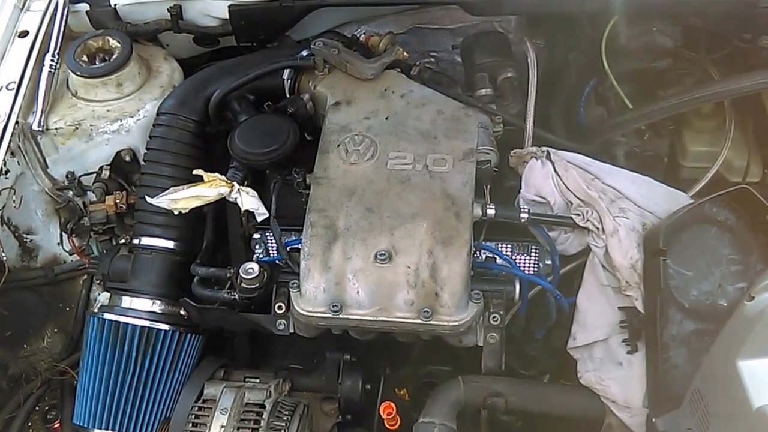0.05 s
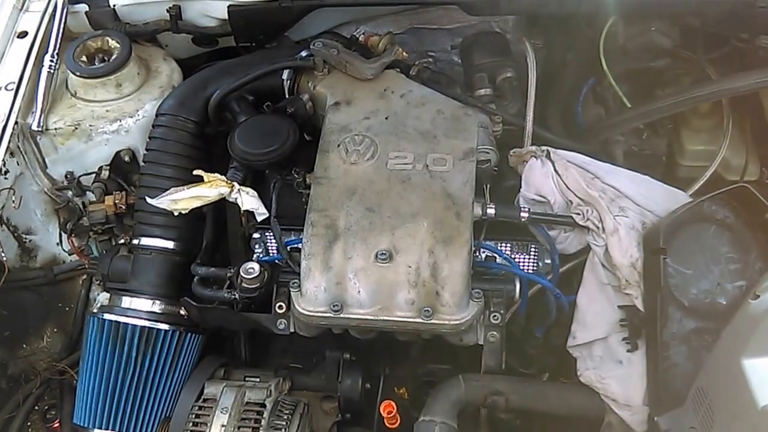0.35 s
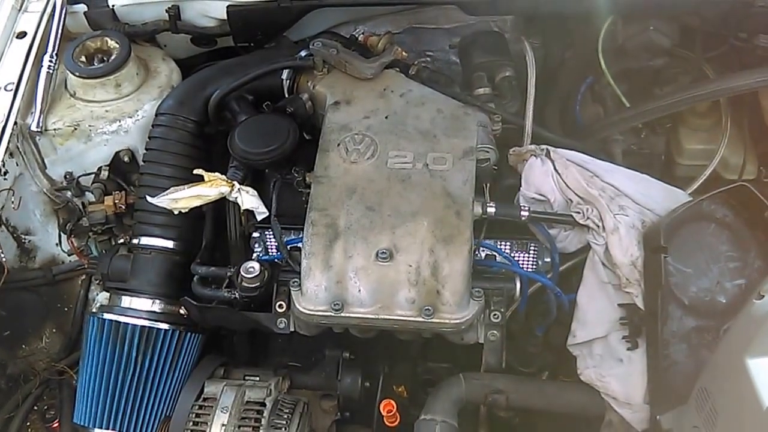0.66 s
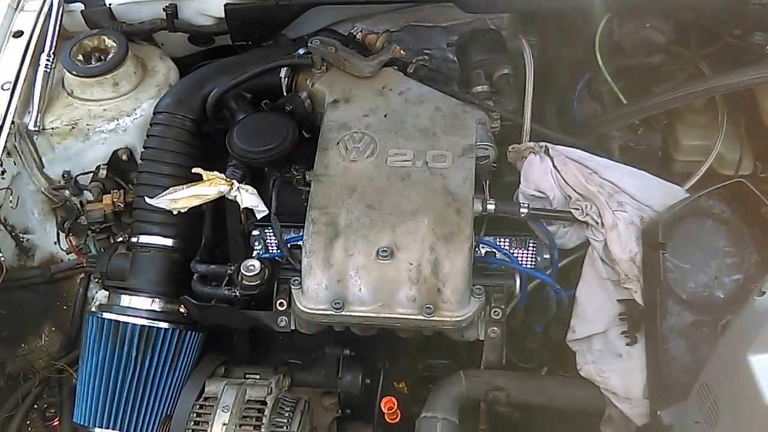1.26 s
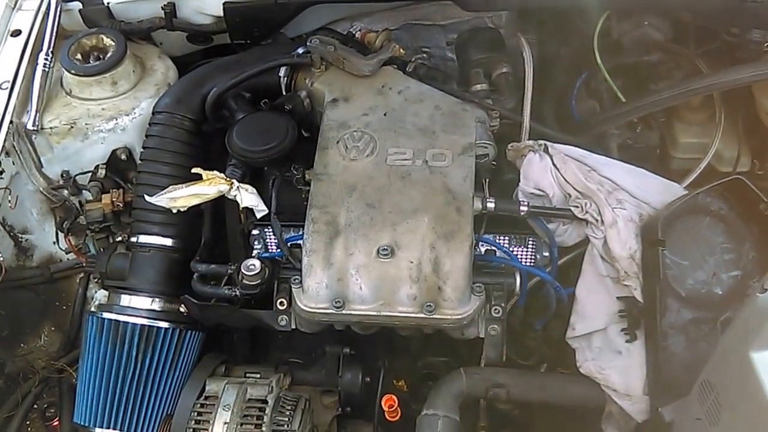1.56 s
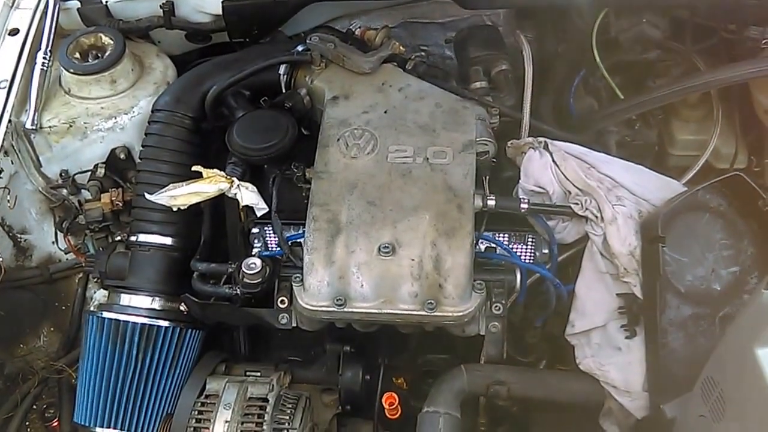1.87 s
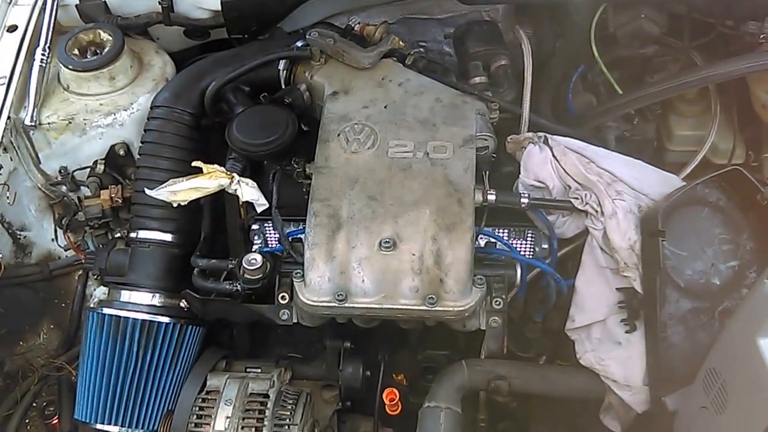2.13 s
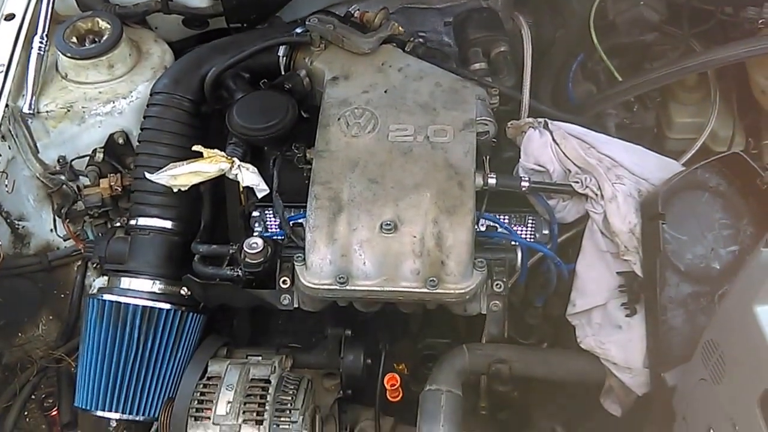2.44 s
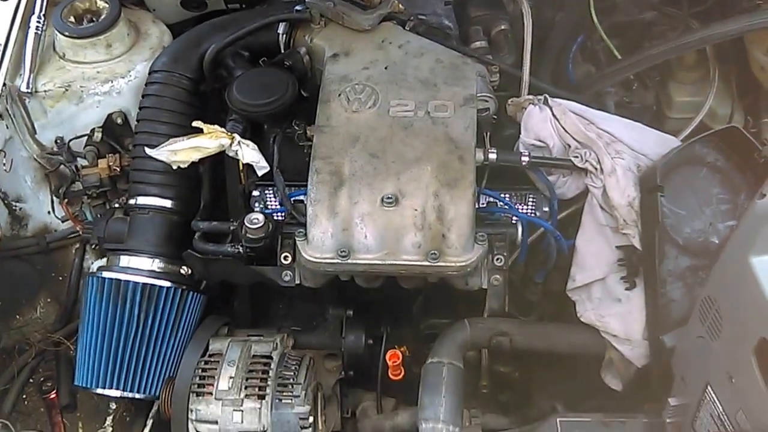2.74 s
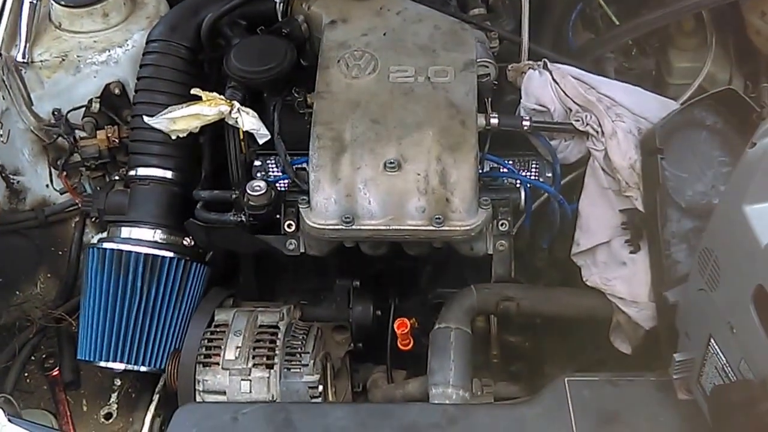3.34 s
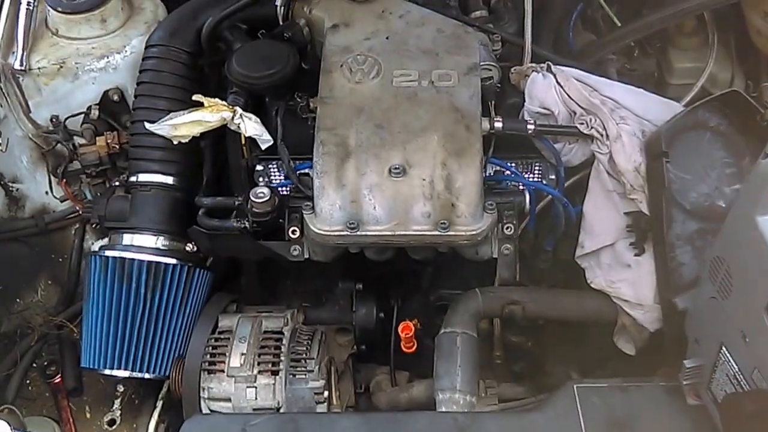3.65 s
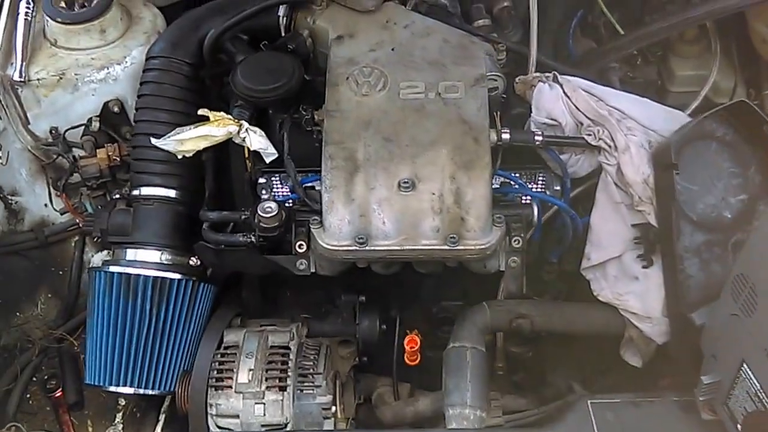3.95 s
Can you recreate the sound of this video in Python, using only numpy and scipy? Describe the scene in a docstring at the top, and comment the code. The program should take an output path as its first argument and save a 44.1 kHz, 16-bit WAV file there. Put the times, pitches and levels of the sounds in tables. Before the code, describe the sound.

A car engine idles throughout the four seconds, heard close over the open engine bay. Its lumpy chug repeats about seven or eight times a second, each a low thump, two sharp airy chuffs and a soft gulp. Faint whistles and a slightly metallic intake hiss lean left, over a steady rumble and whirr. At about 3.2 seconds the engine stumbles briefly, then resumes its rhythm.

```python
"""Lumpy idle at the open engine bay

A four-cylinder petrol engine, two microphones close over the bay and its cone air filter. Each cycle has
four unequal intake strokes: a thump, two sharp chuffs and a soft gulp. Every stroke pushes the air in the
intake, rings it on a rising note and draws a rush of air with faint whistles. The engine stumbles once.
Underneath, the machinery rumbles and whirrs; bonnet and panels throw back short reflections."""
import sys
import numpy as np
from scipy import signal
from scipy.fft import rfft, irfft
from scipy.io import wavfile
from scipy.ndimage import uniform_filter1d

SR = 44100
rng = np.random.default_rng(int(sys.argv[2]) if len(sys.argv) > 2 else 0)


def transcribe(u):
    """Save the signal u as a 16-bit wav file named by the first command-line argument.

    u: samples, shape (n,) or (channels, n), limited to [-1, 1]; the rate is SR.
    q: integer samples, one column per channel.
    """
    v = np.clip(np.atleast_2d(u).T, -1, 1)
    q = np.round(v * 32767).astype(np.int16)
    wavfile.write(sys.argv[1], SR, q)


N = 176400

# engine cycles: thump_s, thump_db, first_chuff_s, first_chuff_db, second_chuff_s, second_chuff_db
ENGINE_CYCLES = [(0.0536, 0.6, 0.081, 0.7, 0.1146, -1.2), (0.1868, 0.6, 0.2132, 1.1, 0.2471, -1.0),
                 (0.3202, -0.7, 0.3466, -0.5, 0.3798, 0.7), (0.4525, 0.3, 0.4788, -0.7, 0.5126, -0.1),
                 (0.5847, 0.1, 0.6115, 1.1, 0.6459, -0.6), (0.7186, -0.7, 0.7456, 0.7, 0.7794, 0.8),
                 (0.8513, 0.5, 0.8774, -1.5, 0.9112, -0.0), (0.9835, -0.5, 1.0102, -1.8, 1.0436, 0.1),
                 (1.1159, -0.1, 1.1427, -2.0, 1.1769, 0.6), (1.2487, -0.0, 1.2756, -1.6, 1.3093, -0.1),
                 (1.3815, 0.3, 1.4085, 0.3, 1.4424, 1.8), (1.5171, 1.4, 1.5448, -0.5, 1.5796, -0.2),
                 (1.6513, 0.4, 1.6784, -0.3, 1.7123, 0.3), (1.7868, 0.4, 1.8146, -0.4, 1.8478, 1.4),
                 (1.9211, 0.1, 1.9482, 0.6, 1.9817, 0.0), (2.0552, -0.5, 2.0829, 0.3, 2.1153, 0.2),
                 (2.1884, -0.9, 2.2156, -0.6, 2.2495, 2.2), (2.3246, 0.4, 2.352, -1.0, 2.386, 0.5),
                 (2.4579, -0.6, 2.4848, -0.4, 2.5171, 1.3), (2.5884, -0.4, 2.6151, 0.6, 2.6495, 0.8),
                 (2.7219, -0.2, 2.7485, -1.2, 2.7827, 1.4), (2.8559, -0.1, 2.883, -1.7, 2.9167, 0.4),
                 (2.9893, 0.1, 3.0165, -0.8, 3.0515, -0.6), (3.1271, -0.4, 3.1643, 2.0, 3.1947, -0.7),
                 (3.2761, -0.8, 3.3045, 0.0, 3.3384, -2.6), (3.4101, -0.2, 3.4376, 0.0, 3.4731, 1.9),
                 (3.5492, -0.2, 3.5772, -1.5, 3.6107, -0.3), (3.6817, 1.1, 3.7081, 0.1, 3.7423, 2.2),
                 (3.815, -1.0, 3.8415, -1.0, 3.875, 0.3), (3.9456, -1.3, 3.972, 1.6, 4.009, 0.0)]
# intake ring by stroke: lag_s, pitch_hz, rise_hz_per_s, level_db, attack_s, hold_s, decay_s, push_db
INTAKE_RINGS = dict( thump=(.0001, 203, 1600, -6.6, .0032, .0002, .0105, -18),
                first=(.0055, 198, 6700, -9.6, .0035, .010, .0058, -11),
                second=(.0047, 196, 6900, -13, .0035, .008, .008, -14),
                gulp=(.005, 200, 3900, -16.6, .003, .010, .015, -23),
                stumble=(.0001, 208, 1900, -4.8, .003, .007, .010, -22))
# rush of air by stroke: lag_s, level_db, attack_s, hold_s, decay_s
AIR_RUSHES = dict( thump=(-.003, -24.6, .005, .004, .013), first=(-.0007, -17.1, .002, .0045, .005),
              second=(-.001, -16.4, .003, .004, .0052), gulp=(-.002, -31.7, .006, .007, .018))
# colours of the air in the two chuffs and in the softer draw of thump and gulp: frequency_hz, level_db
FIRST_CHUFF_COLOUR = [(700, -10.9), (950, -2.7), (1200, -3.5), (1480, -2.8), (1650, -3.9), (1880, 0.0),
                      (2100, -4.0), (2400, -3.3), (3300, -6.6), (4300, -7.9), (5200, -8.9), (8000, -7.0),
                      (11500, -8.5), (15500, -14.1)]
SECOND_CHUFF_COLOUR = [(750, -8.4), (1050, 0.0), (1350, -4.8), (1600, -9.5), (2050, -4.2), (2600, -6.7),
                       (3300, -8.9), (4300, -9.2), (5200, -12.8), (8000, -10.8), (11500, -13.1),
                       (15500, -19.6)]
DRAW_COLOUR = [(600, -12.0), (820, -9.6), (950, 0.0), (1200, -12.7), (1600, -12.1), (2200, -10.5),
               (2620, -8.6), (3200, -12.9), (4200, -14.9), (5000, -16.0), (6000, -14.3), (8000, -11.4),
               (11000, -13.8), (15500, -22.1)]
# balance of the air noise between the microphones: frequency_hz, left_minus_right_db
MIC_BALANCE = [(500, 4.5), (750, -0.1), (1000, -6.1), (1300, 5.6), (1800, 11.1), (3000, 8.2), (4500, 13.2),
               (6500, 11.2), (8500, 8.1), (11000, 2.6), (15500, 5.0)]
# pops and whistles by stroke: stroke, lag_s, pitch_hz, rise_hz_per_s, pitch_scatter_share, # level_db,
# attack_s, hold_s, decay_s, pan_db, drift_db_per_s
STROKE_WHISTLES = [ ("first", -.003, 920, 15000, .04, -25, .003, .001, .003, -4, .5),
                   ("first", .001, 1620, 25000, .10, -22, .003, .002, .003, 9, -.4),
                   ("first", .001, 2450, 12000, .07, -26, .003, .002, .003, 10, 0),
                   ("second", -.003, 950, 13000, .02, -19, .003, .0015, .0035, -6, .3),
                   ("second", .001, 1300, 9000, .06, -24.5, .003, .002, .003, 10, -1),
                   ("second", .001, 2250, 15000, .10, -25, .003, .002, .003, 10, 0),
                   ("second", .001, 4200, 20000, .12, -26, .002, .002, .003, 12, 0),
                   ("second", .030, 670, 3800, .015, -33.5, .008, .016, .010, -4, -2),
                   ("second", .026, 540, 4200, .02, -33.5, .006, .012, .010, -4, -2),
                   ("second", .022, 400, 5000, .04, -33, .004, .010, .012, -3, -2),
                   ("gulp", .003, 1500, 5000, .04, -34.5, .018, .008, .005, 12, -2),
                   ("gulp", .004, 980, 500, .025, -33, .005, .002, .005, -7, 0),
                   ("thump", -.008, 960, 500, .02, -31, .003, .002, .004, -5, 0),
                   ("thump", .006, 965, -1500, .02, -30, .003, .008, .006, -4, 0),
                   ("stumble", .028, 860, 20000, .01, -15, .002, .002, .004, 0, 0)]
# resonances of the intake pipe and filter housing: pitch_hz, width_hz, gain_db
HOUSING_MODES = [(1900, 90, -9), (2620, 150, -4.5), (4400, 160, -4), (6500, 200, -5), (7870, 200, -2),
                 (8650, 220, -4), (10400, 300, -5)]
# colours of the steady machinery: frequency_hz, level_db
RUMBLE_COLOUR = [(15, -10), (28, -6), (38, -18), (55, -3), (85, -1), (120, -2), (160, 3), (250, -2),
                 (380, -3), (550, -17), (900, -27), (2000, -50)]
WHIRR_COLOUR = [(300, -12), (550, -3), (950, -2), (1300, -6), (2500, -6), (5000, -14), (9000, -14),
                (15500, -26)]


def engine_strokes(stumble_cycle=23, gulp_lag_s=.0375):
    """Rows of start_s, strength_db by stroke; in the stumble a second thump replaces the first chuff."""
    thump, first, second = np.hsplit(np.array(ENGINE_CYCLES), 3)
    cycle_s = thump[1, 0] - thump[0, 0]
    second = np.vstack([second[0] - [cycle_s, 0], second])  # already running at the start
    gulp = np.column_stack([second[:, 0] + gulp_lag_s, np.zeros(len(second))])
    stumble = np.array([[first[stumble_cycle, 0], 0]])
    first = np.delete(first, stumble_cycle, axis=0)
    return dict(thump=thump, first=first, second=second, gulp=gulp, stumble=stumble)


def intake(strokes, strength_share=.4, pitch_scatter=.015, scatter_db=1.1):
    """Each stroke pushes the air column, then sucks on it so that it rings on a rising note."""
    out = np.zeros(N)
    # slow swing of the air in the whole intake
    push = envelope(attack_s=.0045, hold_s=0, decay_s=.011) * glide(hz=82, rise_hz_per_s=1200)
    for kind, (lag, hz, rise, db, attack, hold, decay, push_db) in INTAKE_RINGS.items():
        for start, strength_db in strokes[kind]:
            pitch_luck, level_luck, decay_luck = rng.standard_normal(3)
            gain = undb(strength_share * strength_db)
            shape = envelope(attack, hold, decay * np.exp(.15 * decay_luck))
            ring = shape * glide(hz * (1 + pitch_scatter * pitch_luck), rise)
            add(out, start, gain * undb(push_db) * push)
            add(out, start + lag, -gain * undb(db + scatter_db * level_luck) * ring)
    return out


def rushing_air(strokes, roughness=.2):
    """A gritty burst of turbulence in each stroke: short and loud in chuffs, long and soft otherwise."""
    out = np.zeros((2, N))
    colours = dict(thump=DRAW_COLOUR, first=FIRST_CHUFF_COLOUR,
                   second=SECOND_CHUFF_COLOUR, gulp=DRAW_COLOUR)
    for kind, (lag, db, attack, hold, decay) in AIR_RUSHES.items():
        flow = np.zeros(N)
        rows = np.vstack([strokes[kind], strokes["stumble"]]) if kind == "thump" else strokes[kind]
        for start, strength_db in rows:
            add(flow, start + lag, undb(db + strength_db) * envelope(attack, hold, decay))
        eddies = uniform_filter1d(rng.standard_normal(N), size=30)
        grit = np.exp(roughness * eddies / eddies.std() - roughness ** 2)
        out += flow * grit * air_at_mics(colours[kind], low_hz=680)
    return out


def air_at_mics(colour, low_hz, likeness=.14):
    """Turbulence, partly alike at the two microphones, its treble to the left by the air filter."""
    common = noise(colour, low_hz)
    separate = np.array([noise(colour, low_hz) for _ in range(2)])
    pair = np.sqrt(likeness) * common + np.sqrt(1 - likeness) * separate
    hz = np.arange(N // 2 + 1) * SR / N
    return irfft(rfft(pair) * pan(on_log(MIC_BALANCE, hz)), N)


def housing(rush):
    """The rushing air rings the pipe and filter housing with a metallic colour."""
    out = rush
    for hz, width, db in HOUSING_MODES:
        out = out + undb(db) * signal.lfilter(*signal.iirpeak(hz, hz / width, fs=SR), rush)
    return out


def whistles(strokes, scatter_db=1.6):
    """Short tones that open the chuffs, and faint rising whistles that sing between them."""
    out = np.zeros((2, N))
    for kind, lag, hz, rise, scatter, db, attack, hold, decay, pan_db, drift in STROKE_WHISTLES:
        for start, strength_db in strokes[kind]:
            pitch_luck, level_luck = rng.standard_normal(2)
            tone = envelope(attack, hold, decay) * glide(hz * (1 + scatter * pitch_luck), rise)
            level_db = db + drift * start + strength_db + scatter_db * level_luck
            add(out, start + lag, pan(pan_db) * undb(level_db) * tone)
    return out


def machinery(rumble_db=-30.8, spread_db=-13, whirr_db=-39):
    """Block, belts and alternator: a steady rumble, much alike at both microphones, and a wide whirr."""
    spread = np.array([noise(RUMBLE_COLOUR, low_hz=15) for _ in range(2)])
    rumble = noise(RUMBLE_COLOUR, low_hz=15) + undb(spread_db) * spread
    whirr = air_at_mics(WHIRR_COLOUR, low_hz=200)
    return undb(rumble_db) * rumble, undb(whirr_db) * whirr


def engine_bay(direct, echo_db=-13, t60_s=.10, top_hz=4000):
    """The direct sound with dense, short, dull reflections from the nearby bonnet and panels."""
    fade = envelope(attack_s=.004, hold_s=0, decay_s=t60_s / np.log(1000))
    echoes = rng.standard_normal((2, len(fade))) * fade
    echoes = signal.sosfilt(signal.butter(1, top_hz, fs=SR, output="sos"), echoes)
    echoes /= np.sqrt((echoes ** 2).sum(axis=1, keepdims=True))
    return direct + undb(echo_db) * signal.fftconvolve(direct, echoes, axes=1)[:, :N]


def undb(db):
    """Decibels to gain."""
    return 10 ** (np.asarray(db) / 20)


def on_log(points, hz):
    """Read rows of frequency_hz, level_db along a log-frequency axis."""
    point_hz, point_db = np.array(points, float).T
    return np.interp(np.log(np.maximum(hz, 1)), np.log(point_hz), point_db)


def pan(db):
    """Gains for the two microphones; positive db leans left."""
    return undb(np.array([[.5], [-.5]]) * db)


def noise(colour, low_hz):
    """Noise of rms 1 with the given colour, falling steeply below low_hz."""
    hz = np.arange(N // 2 + 1) * SR / N
    gain = undb(on_log(colour, hz)) * (1 - 1 / (1 + (hz / low_hz) ** 4))
    coloured = irfft(rfft(rng.standard_normal(N)) * gain, N)
    return coloured / coloured.std()


def stroke_time():
    """Time axis long enough for one stroke to die away."""
    return np.arange(SR // 8) / SR


def envelope(attack_s, hold_s, decay_s):
    """Smooth rise, hold, exponential fall."""
    t = stroke_time()
    onset = np.sin(np.pi / 2 * np.clip(t / attack_s, 0, 1)) ** 2
    return onset * np.exp(-np.maximum(t - attack_s - hold_s, 0) / decay_s)


def glide(hz, rise_hz_per_s):
    """A resonance whose pitch moves at a steady rate."""
    t = stroke_time()
    return np.sin(2 * np.pi * (hz * t + rise_hz_per_s * t * t / 2))


def add(out, start_s, sound):
    """Mix a sound in at a start time."""
    offset = int(round(start_s * SR))
    begin, end = max(offset, 0), min(offset + sound.shape[-1], N)
    if end > begin:
        out[..., begin:end] += sound[..., begin - offset:end - offset]


def scene():
    """Close over the engine: the bass arrives direct, near the centre; the treble echoes in the bay."""
    strokes = engine_strokes()
    rumble, whirr = machinery()
    bass = intake(strokes) + rumble
    treble = housing(rushing_air(strokes)) + whistles(strokes) + whirr
    return pan(db=1.05) * bass + engine_bay(treble)


def record(dry):
    """The recorder clips at full scale, thins the deepest bass and cuts the top."""
    low_cut_hz, top_hz = 38, 16000
    clipped = np.clip(dry, -1, 1)
    thinned = signal.sosfilt(signal.butter(1, low_cut_hz, "highpass", fs=SR, output="sos"), clipped)
    return signal.sosfilt(signal.ellip(10, .1, 80, top_hz, fs=SR, output="sos"), thinned)


dry = scene()
out = record(dry)
transcribe(out)
```